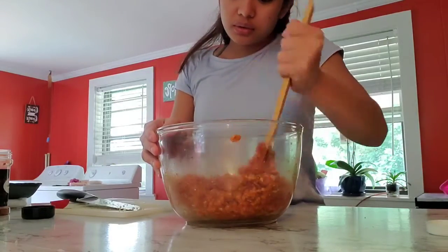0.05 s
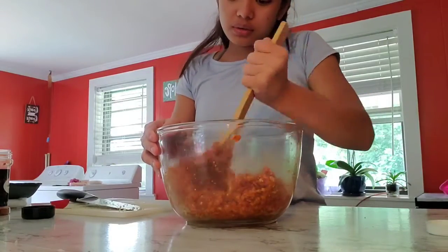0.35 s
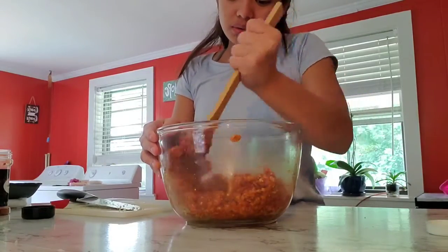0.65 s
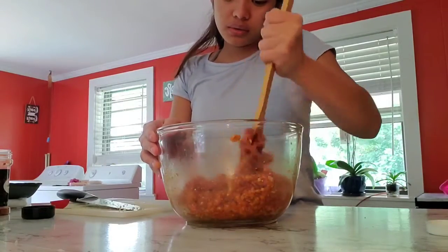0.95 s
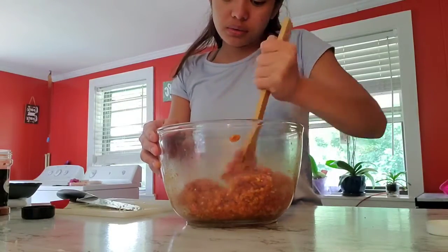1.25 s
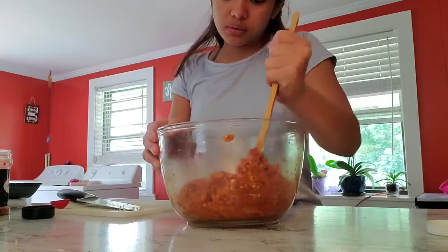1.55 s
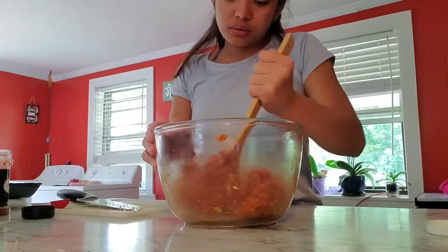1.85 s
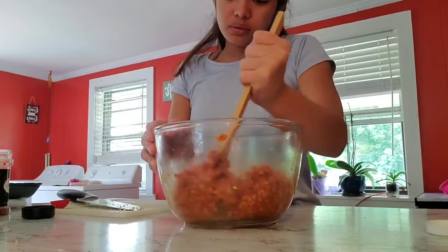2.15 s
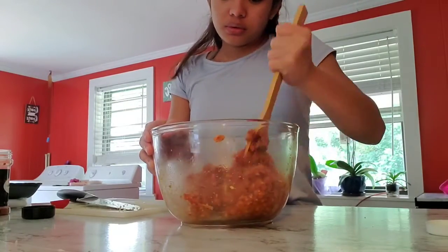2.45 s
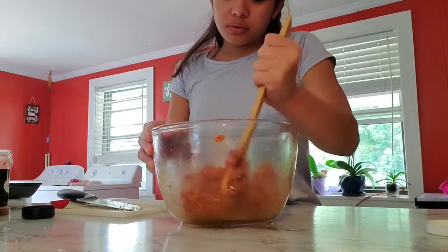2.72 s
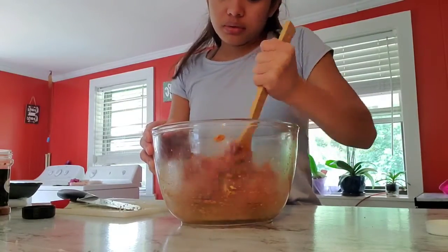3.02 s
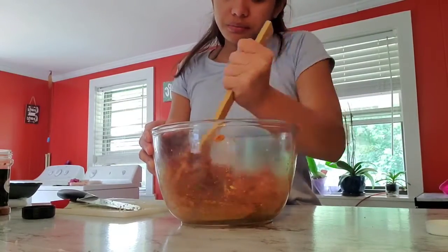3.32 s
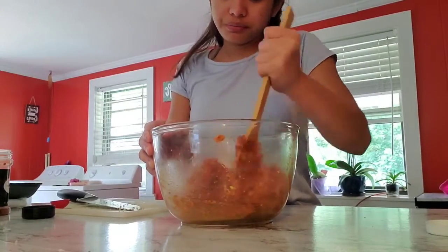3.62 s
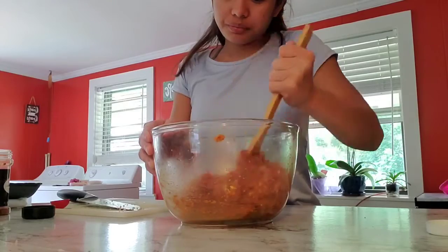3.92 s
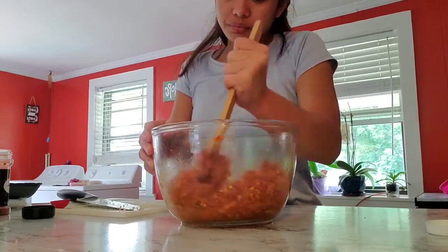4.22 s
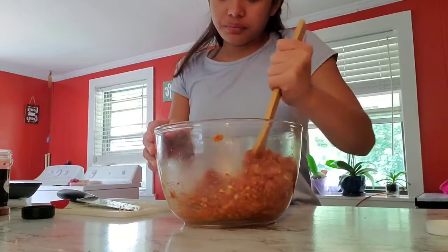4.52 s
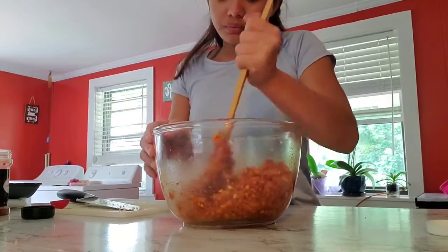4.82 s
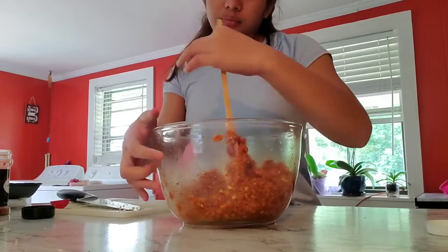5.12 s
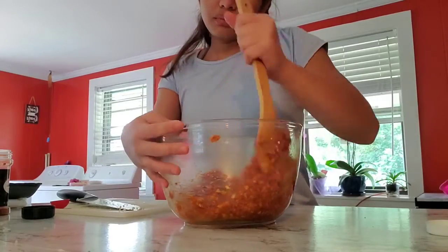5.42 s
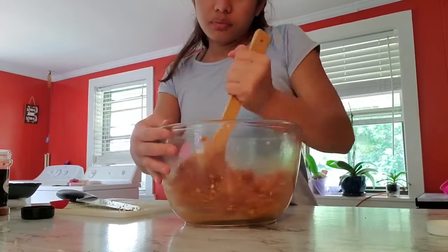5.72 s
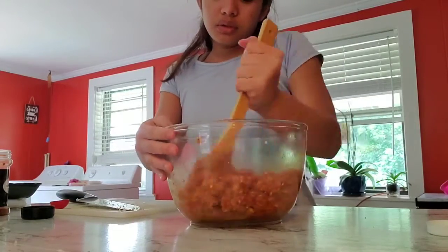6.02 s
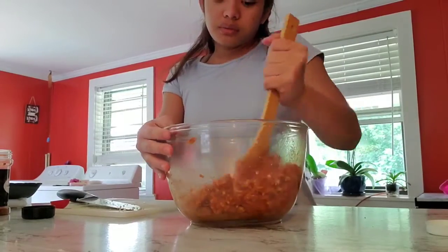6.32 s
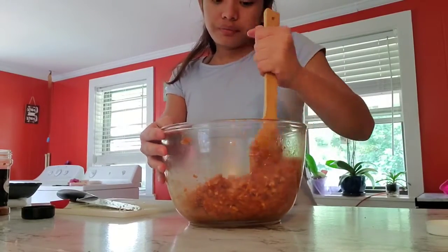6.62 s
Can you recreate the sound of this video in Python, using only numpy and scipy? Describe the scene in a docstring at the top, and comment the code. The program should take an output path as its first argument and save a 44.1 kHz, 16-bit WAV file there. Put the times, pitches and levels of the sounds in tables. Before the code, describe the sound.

An appliance drones and faintly whines in a kitchen while thick mince is stirred in a glass bowl right by the microphone. Each stroke brings a wet squelch and a fine sticky crackle. Cushioned knocks of the wooden spoon ring the glass briefly and thump the counter about twice a second. Later, the low rumble of a passing vehicle swells through the walls and eases.

```python
"""A kitchen counter, stereo microphone close to a glass bowl: a wooden spoon stirs sticky minced meat.
Each stroke pulls the mince apart with a crackle and a squelch. The spoon knocks the glass, mostly
cushioned by meat, and the bowl thumps the counter. Behind it an appliance hums and whines throughout;
farther off, in the second half, a vehicle rumbles past outside, dulled by the walls."""
import sys
import numpy as np
from scipy import signal
from scipy.fft import rfft, irfft, next_fast_len
from scipy.io import wavfile
from scipy.ndimage import uniform_filter1d, map_coordinates

SR = 44100
rng = np.random.default_rng(int(sys.argv[2]) if len(sys.argv) > 2 else 0)


def unload_audio(sound):
    """Save the sound as a 16-bit wav file, at the path given as the first command line argument."""
    columns = np.transpose(np.atleast_2d(sound))
    # keep every value between -1 and 1, then stretch to whole-number steps
    steps = np.round(np.clip(columns, -1, 1) * 32767)
    wavfile.write(sys.argv[1], SR, steps.astype(np.int16))


N = 293814

# spoon strokes through the mince: t/s, length of push/s, crackle level/dB, squelch level/dB
STROKES = [(-0.1, 0.12, -58.5, -60.5), (0.234, 0.074, -57.5, -54), (.43, 0.23, -56, -58.5),
           (.7, .03, -64, -56), (0.923, .1, -55, -51.5), (1.1, 0.19, -59.5, -77), (1.345, .2, -54, -55),
           (1.7, .13, -56, -54.5), (1.95, 0.19, -57.5, -55), (2.21, 0.13, -56, -54),
           (2.445, 0.15, -54.5, -52.5), (2.82, .25, -54.5, -55), (3.06, 0.27, -59, -55),
           (3.279, 0.17, -55, -52.5), (3.535, .15, -56.5, -51), (3.77, 0.044, -56.5, -56),
           (3.905, 0.029, -57, -54.5), (4.0, 0.31, -54.5, -53.5), (4.31, 0.057, -52, -50),
           (4.525, 0.11, -55.5, -52), (4.72, 0.21, -55.5, -51.5), (5.31, .05, -67, -67),
           (5.4, 0.015, -58, -57), (5.575, 0.022, -67.5, -55), (5.698, 0.098, -52.5, -50.5),
           (5.91, 0.18, -56, -51), (6.13, 0.077, -54, -51), (6.32, 0.17, -56, -52), (6.57, .1, -58, -56.5)]
# spectra of the sticky crackle and the wet squelch: f/Hz, level/dB
CRACKLE_SPECTRUM = [(1500, -51), (3000, -2.5), (4300, -3), (5600, -1.5), (7300, 4), (8100, -4.5),
                    (9800, -3), (11300, 1.5), (13000, -4.5), (15500, -4)]
SQUELCH_SPECTRUM = [(300, 10), (700, 8.5), (1200, 4.5), (1800, -4), (2400, 2), (3200, -1), (4200, 0.5),
                    (5500, -9.5), (8000, -26)]
# air squeezed out of pockets in the meat: t/s, level/dB, f/Hz, decay/s
SQUISHES = [(0.615, -52.5, 2600, 0.023), (0.806, -50, 2544, .006), (0.942, -42, 650, 0.014),
            (1.8, -47, 1220, .03), (1.804, -39, 3410, 0.013), (1.805, -58, 4800, .02),
            (2.041, -49, 705, 0.026), (2.09, -44.5, 730, 0.017), (2.099, -43.5, 2480, 0.0074),
            (5.741, -46.5, 4300, 0.016), (5.746, -51, 10700, 0.019), (5.951, -49, 3742, 0.017)]
# strands of meat snapping off the spoon: t/s, level/dB
SNAPS = [(5.320, -59), (5.371, -52), (5.411, -52), (5.435, -47)]
# spoon on bowl: t/s, level/dB, contact bandwidth/Hz, thump/dB, rim note/dB, ring time factor, clack/dB
KNOCKS = [(0.2790, -20, 557, 3, -8, 0.54, -31), (0.9672, -23, 465, 3.5, 2, 0.38, -34),
          (1.2590, -23, 668, 9, -3, 1.84, -6.5), (1.7312, -26, 476, 4, -7, 0.24, -32),
          (2.2589, -40.5, 460, 12, 6.5, .5, -43), (2.7529, -31, 2000, -9, -0.5, 0.72, -0.5),
          (2.8726, -41, 287, 13.5, -5, .5, -34), (3.2849, -7, 524, -17.5, -7.5, 0.43, -51),
          (3.9227, -28, 493, 7, -1.5, 1, -33), (4.3446, -14, 570, -3, -0.5, 0.26, -30),
          (4.748, -43.5, 586, 10, -5, 0.28, -31), (4.841, -23.5, 670, 2, -3, 0.57, -16),
          (5.58, -23, 1170, -10.5, 0.5, 1.16, -6.5), (5.75, -40, 497, 6, -18, 0.39, -2),
          (6.122, -40.5, 418, 8.5, 1, 0.55, -28), (6.5240, -32.5, 564, 2, -12, 0.7, -29)]
# modes of the bowl (rim note first) and the counter: f/Hz, level/dB, t60/s, left over right/dB
GLASS_MODES = [(626, 2, 0.14, 2), (724, -5.5, 0.068, 6), (890, -8, 0.016, -7), (1082, 1, 0.027, 8.5),
               (1393, -13.5, 0.093, -7), (1563, -9.5, 0.17, 17.5), (2350, 6.5, 0.024, -7),
               (2860, -4.5, 0.16, -7)]
COUNTER_MODES = [(166, -6.5, 0.072, -4.5), (219.4, -7, 0.065, -3.5), (340, -9, 0.029, -6.5),
                 (443, -6, 0.028, -8.5), (586, -8.5, 0.054, -11)]
# bare wood on glass: f/Hz, level/dB
CLACK_SPECTRUM = [(300, -16), (800, 9.5), (1200, 5), (1800, -7.5), (2350, -0.5), (2950, -5), (3500, -13),
                  (4500, -21), (5500, -48), (7200, -18), (8500, -47), (15000, -52)]
# the appliance's low drone: t/s, level/dB
DRONE_LEVELS = [(0.0, -37), (0.05, -41), (0.61, -38.5), (0.96, -40.5), (1.04, -52), (1.41, -41),
                (1.78, -48), (1.98, -39.5), (2.52, -53), (3.17, -34.5), (3.65, -41.5), (5.23, -46),
                (6.57, -41), (6.66, -39)]
# the vehicle passing outside: t/s, engine f/Hz, engine level/dB, road level/dB
VEHICLE_PASS = [(0, 34.03, -79, -78), (3.2, 35.96, -56.5, -61), (4.05, 34.2, -52, -44.5),
                (4.6, 33.59, -40, -45), (5.1, 33.9, -43, -44), (5.5, 32.83, -42, -44),
                (6.1, 31.8, -47.5, -46), (6.66, 31.6, -46, -51)]
# engine harmonics: multiple of the engine frequency, level/dB
ENGINE_ORDERS = [(2, 0), (3, -0.5), (4, -8.5), (5, -12.5), (6, -11.5)]
# road rumble from indoors, and the room tone: f/Hz, level/dB
ROAD_SPECTRUM = [(40, -16.5), (90, 8), (130, 2.5), (190, -8.5), (280, -15), (400, -11.5), (800, -18.5),
                 (1300, -24), (2000, -34.5), (5000, -64)]
ROOM_SPECTRUM = [(20, -30), (35, -2), (60, -1), (85, -2), (130, -10), (250, -17.5), (600, -23), (900, -28),
                 (1350, -29), (1900, -48), (4000, -46), (15000, -62)]
# likeness of the microphone's two channels: f/Hz, correlation
STEREO_LIKENESS = [(60, 1), (150, 0.76), (300, 1), (450, 0), (700, 0.63), (1300, 0), (4000, 0.27),
                   (12000, 0)]
# the kitchen's reverberation: f/Hz, t60/s
KITCHEN_T60 = [(150, 0.37), (500, 0.25), (2500, 0.37), (7000, 0.28), (15000, 0.21)]


def meat():
    """Close up, mince parts in a fine crackle over a lower squelch; it sticks and gives unevenly."""
    sticky, wet = stirring() * amp(-0.2 * wobble(22))
    sticky = sticky * amp(1.05 * wobble(35))
    crackle = patchy(spread(pops(per_s=8000, size_db=7.0), CRACKLE_SPECTRUM), depth_db=2.5)
    wet = wet * amp(2.05 * wobble(30))
    squelch = patchy(spread(pops(per_s=2800, size_db=4.5), SQUELCH_SPECTRUM), depth_db=3.0)
    return in_kitchen(at_bowl(sticky * crackle + wet * squelch), wet_db=-11)


def stirring(settle_crackle_db=-81, settle_squelch_db=-75):
    """Crackle and squelch strength: strokes add in power to the faint settling of the mince."""
    power = amp([[settle_crackle_db], [settle_squelch_db]]) ** 2
    for s, push_s, crackle_db, squelch_db in STROKES:
        power = power + (amp([[crackle_db], [squelch_db]]) * stroke(s, push_s)) ** 2
    return np.sqrt(power)


def stroke(s, push_s, grip_s=0.024, yield_s=0.048, let_go_s=0.13, sag_db_per_s=20):
    """Effort of one stroke: the spoon takes hold, pushes while easing off, and the mince lets go."""
    t = np.arange(N) / SR - s
    grip = (1 + np.tanh((t - grip_s) / yield_s)) / 2
    fade = (np.maximum(t - push_s, 0) / let_go_s) ** 1.3
    return grip * amp(-sag_db_per_s * np.maximum(t, 0)) * np.exp(-fade)


def pops(per_s, size_db):
    """Tiny wet films burst at random, a few large among many small."""
    chance, size = rng.random((2, N)), rng.standard_normal((2, N))
    bursts = (chance < per_s / SR) * np.sign(size)
    return unit(bursts * amp(size_db * np.minimum(np.abs(size), 2.5)))


def patchy(pair, depth_db):
    """Narrow bands swell and dip at random for a few hundredths of a second, making the sound patchy."""
    bands = signal.stft(pair, nperseg=512)[2]
    lift = uniform_filter1d(rng.standard_normal(bands.shape[1:]), size=6, axis=0)
    lift = unit(uniform_filter1d(lift, size=4, axis=1))
    return unit(signal.istft(bands * amp(depth_db * lift), nperseg=512)[1][:, :N])


def squishes(sharpness=7, rise_s=0.004):
    """Air pockets sputter at their own pitch, and single strands snap."""
    out, t = np.zeros((2, N)), np.arange(SR // 5) / SR
    for s, db, hz, decay_s in SQUISHES:
        sputter = filtered(noise_pair(len(t)), lambda f: resonance(f, hz, 2 * hz / sharpness) ** 2)
        add(out, amp(db) * unit(sputter) * (1 - np.exp(-t / rise_s)) * np.exp(-t / decay_s), s)
    for s, db in SNAPS:
        snap = filtered(noise_pair(len(t)), lambda f: resonance(f, 10600, 6000) ** 2)
        add(out, amp(db) * unit(snap) * np.exp(-t / 0.0015), s)
    return in_kitchen(out, wet_db=-11)


def knocks(clack_t60=0.033, low_cut_hz=90, right_lag_s=0.00005):
    """Spoon hits glass; meat between them lengthens the contact, dulling the blow, and damps the ring."""
    out, t = np.zeros((2, N)), np.arange(SR // 2) / SR
    lead = SR // 100
    for s, db, contact_hz, thump_db, rim_db, t60_factor, clack_db in KNOCKS:
        # a blow high on the wall drives the rim note harder
        rim = amp(rim_db) * ring(GLASS_MODES[:1], t, t60_factor)
        glass = rim + ring(GLASS_MODES[1:], t, t60_factor)
        # the bowl pushes on the counter at the same instant
        body = glass + amp(thump_db) * ring(COUNTER_MODES, t)
        # bare wood adds a dry clack that opens with a fine tick
        clack = spread(noise_pair(len(t)), CLACK_SPECTRUM) * amp(-60 * t / clack_t60)
        tick = amp(-10) * noise_pair(len(t)) * np.exp(-t / 0.0006)
        body, wood = np.pad([-body, clack + tick], ((0, 0), (0, 0), (lead, 0)))
        # a bell-shaped force pulse; slow motion radiates poorly; the left capsule hears it first
        pulse = lambda f: np.exp(-0.5 * (f / contact_hz) ** 2 - 1j * np.pi * f / contact_hz)
        radiation = lambda f: 1j * f / (low_cut_hz + 1j * f)
        arrival = lambda f: np.exp(-2j * np.pi * f * np.array([[0], [right_lag_s]]))
        blow = in_kitchen(filtered(body, lambda f: pulse(f) * radiation(f) * arrival(f)), wet_db=-10)
        wood = in_kitchen(at_bowl(wood), wet_db=-2.5)
        add(out, amp(db) * (blow + amp(clack_db) * wood), s - lead / SR)
    return out


def ring(modes, t, t60_factor=1, scatter_db=0.76, detune=0.0056):
    """Modes decay from one push; the shifting meat loads them a little differently each time."""
    out = 0
    for hz, db, t60, side_db in modes:
        level_draw, pitch_draw = rng.standard_normal(2)
        envelope = amp(db + scatter_db * level_draw - 60 * t / (t60 * t60_factor))
        out += pan(side_db) * envelope * np.cos(2 * np.pi * hz * (1 + detune * pitch_draw) * t)
    return out


def appliance(drone_hz=68.7, mains_hz=59.4, whine_hz=462.3):
    """A swelling drone beats against mains hum; a fan whines in a narrow skirt of noise."""
    tone = lambda hz, db: amp(db) * np.sqrt(2) * np.exp(2j * np.pi * np.cumsum(hz) / SR)
    drone = tone(drone_hz + 0.5 * wobble(4.05), db=curves(DRONE_LEVELS)[0])
    mains = tone(mains_hz + 0.7 * wobble(4), db=-50.5 + 2 * wobble(4))
    fan = tone(whine_hz + 1.41 * wobble(15), db=-49 + 0.81 * wobble(2.46))
    skirt = unit(filtered(rng.standard_normal(N), lambda f: resonance(f, whine_hz, width_hz=55)))
    whine = fan + amp(-55) * signal.hilbert(skirt)
    # both sounds meet the two capsules out of step
    capsules = lambda x, radians: (x * np.exp(1j * np.array([[0], [radians]]))).real
    return pan(-1.9) * capsules(drone + mains, -0.2) + pan(-1.4) * capsules(whine, 2.155)


def vehicle():
    """Outside, engine orders and road rumble swell and fade, dulled by the walls."""
    hz, engine_db, road_db = curves(VEHICLE_PASS)
    phase = 2 * np.pi * np.cumsum(hz + 0.27 * wobble(6)) / SR
    engine = unit(sum(amp(db + 3.4 * wobble(1.826)) * np.sin(k * phase) for k, db in ENGINE_ORDERS))
    road = spread(noise_pair(N), ROAD_SPECTRUM)
    return pan(-2.1) * (amp(engine_db) * engine + amp(road_db) * road)


def room_tone(level_db=-48):
    """The steady low rush of the room, all round the microphone."""
    return pan(0.14) * amp(level_db) * spread(noise_pair(N), ROOM_SPECTRUM)


def in_kitchen(x, wet_db, build_s=0.0009):
    """The direct sound plus a diffuse tail from the walls."""
    hz, t, bands = signal.stft(noise_pair(SR // 2), SR, nperseg=256)
    envelope = amp(-60 * t / along(KITCHEN_T60, hz)[:, None]) * (1 - np.exp(-t / build_s))
    tail = signal.istft(bands * envelope, SR, nperseg=256)[1]
    reverb = signal.fftconvolve(x, tail / np.linalg.norm(tail[0]), axes=1)
    return x + amp(wet_db) * reverb[:, :x.shape[-1]]


def at_bowl(x):
    """The bowl stands a little right of the microphone's axis."""
    return pan(-2.3) * x


def spread(pair, spectrum):
    """Two unrelated signals coloured and mixed to stereo of rms 1: alike in the bass, wide on top."""
    def response(hz):
        angle = np.arccos(along(STEREO_LIKENESS, hz)) / 2
        return amp(along(spectrum, hz)) * [np.cos(angle), np.sin(angle)]
    mid, side = filtered(pair, response)
    return unit(np.array([mid + side, mid - side]))


def amp(db):
    """Decibels to gain."""
    return 10 ** (np.asarray(db) / 20)


def unit(x):
    """Scaled to rms 1."""
    return x / np.sqrt(np.mean(x ** 2) + 1e-20)


def pan(db):
    """Channel gains, left over right by db."""
    return amp(np.array([[db], [-db]]) / 2)


def along(points, hz):
    """Read (f/Hz, value) points on a log axis."""
    f, values = np.transpose(points)
    return np.interp(np.log(hz + 1), np.log(f + 1), values)


def curves(rows):
    """One value per sample for each column after the time."""
    s, *columns = np.transpose(rows)
    return [np.interp(np.arange(N) / SR, s, column) for column in columns]


def noise_pair(n):
    """Two unrelated white noises."""
    return rng.standard_normal((2, n))


def wobble(rate):
    """A smooth random curve, rate knots a second."""
    return map_coordinates(rng.standard_normal(1024), [np.arange(N) * rate / SR], mode="mirror")


def filtered(x, response):
    """x through a frequency response."""
    n = x.shape[-1]
    size = next_fast_len(n + 8192)
    return irfft(rfft(x, size) * response(np.fft.rfftfreq(size, 1 / SR)), size)[..., :n]


def resonance(f, centre_hz, width_hz):
    """Causal response of one resonance."""
    return 1j * f * width_hz / (centre_hz ** 2 - f ** 2 + 1j * f * width_hz)


def add(track, sound, s):
    """Mix a sound into the track at time s."""
    start = max(round(s * SR), 0)
    track[:, start:start + sound.shape[-1]] += sound[..., :N - start]


def scene():
    """Bowl and meat at the microphone, kitchen and road behind."""
    return knocks() + meat() + squishes() + appliance() + vehicle() + room_tone()


def record(dry):
    """The recorder keeps nothing above its band limit."""
    top_hz = 15600
    return filtered(dry, lambda hz: 1 / (1 + np.minimum(hz / top_hz, 2) ** 200))


dry = scene()
out = record(dry)
unload_audio(out)
```